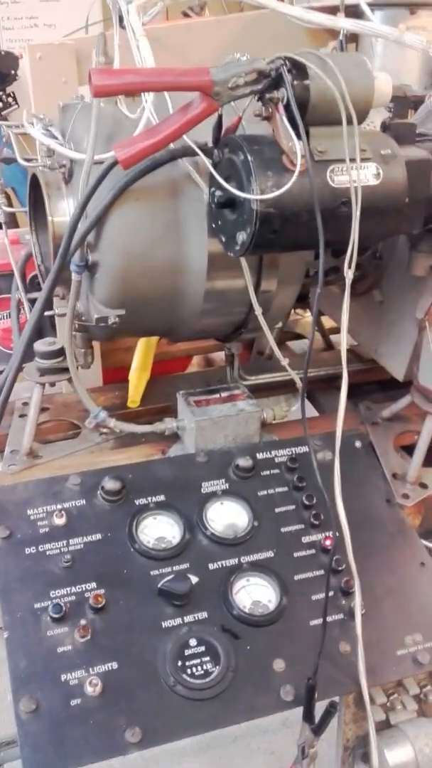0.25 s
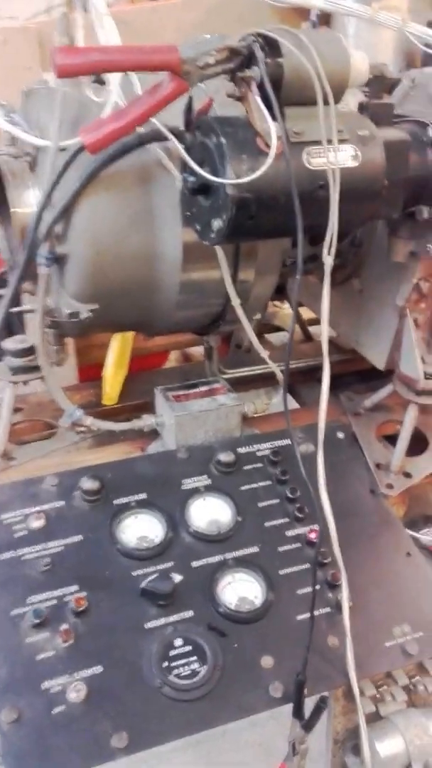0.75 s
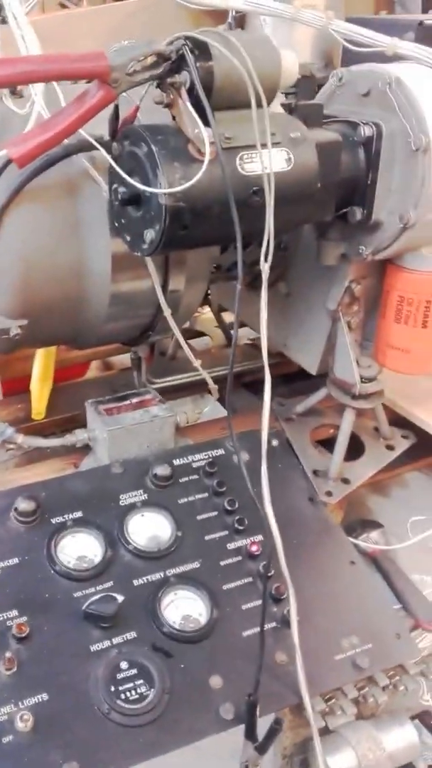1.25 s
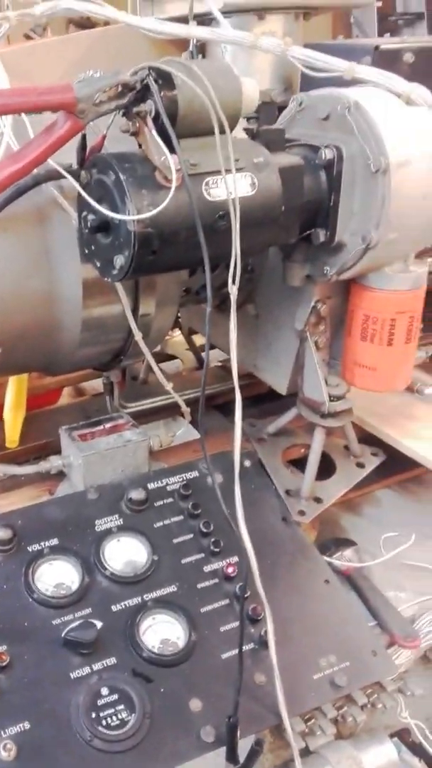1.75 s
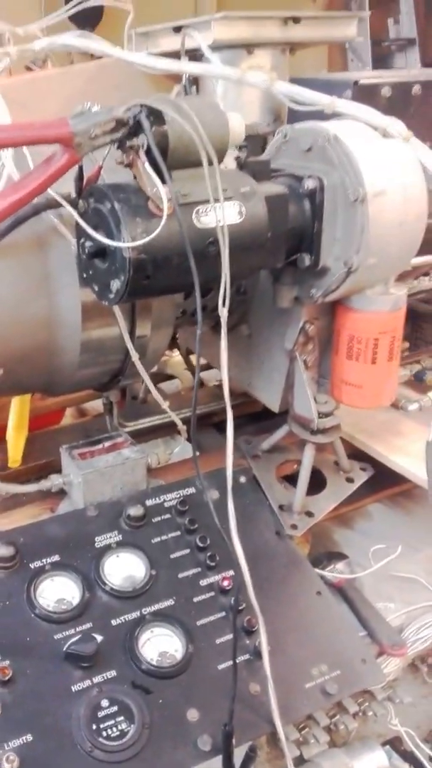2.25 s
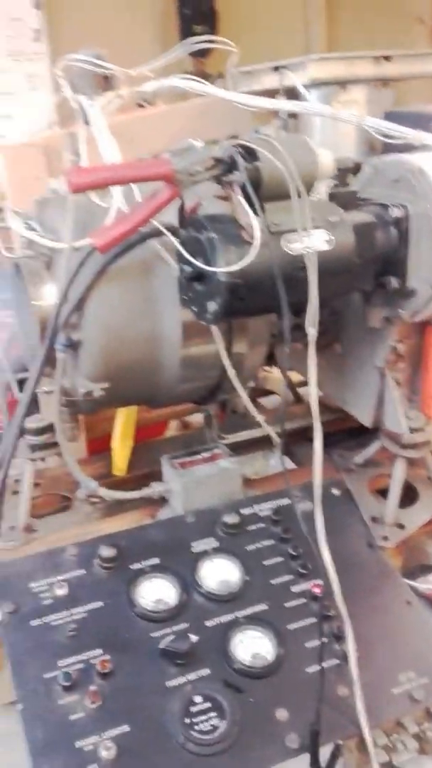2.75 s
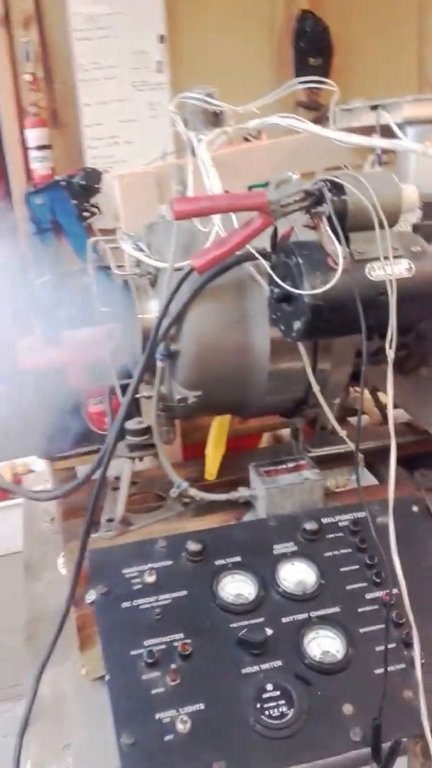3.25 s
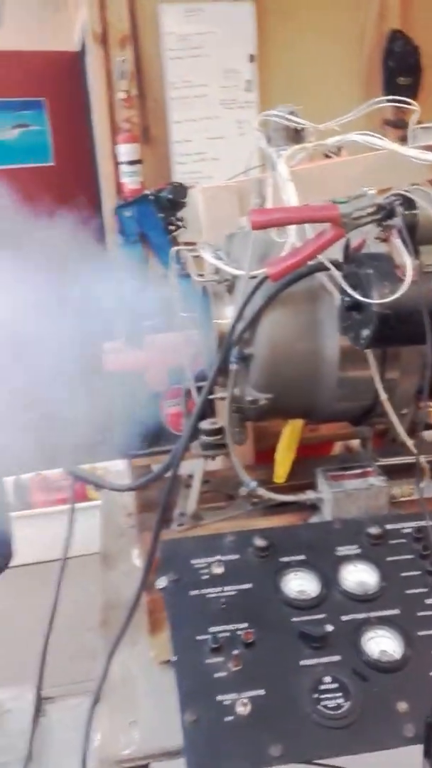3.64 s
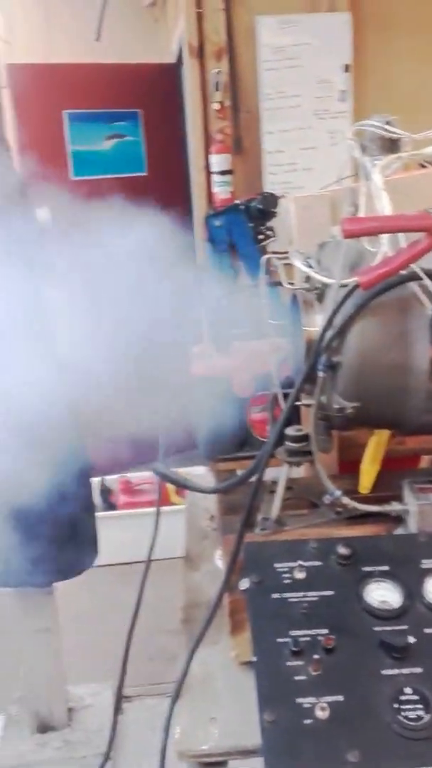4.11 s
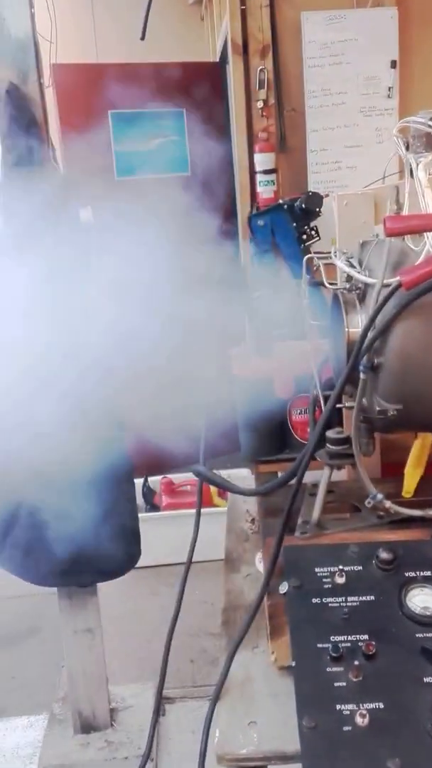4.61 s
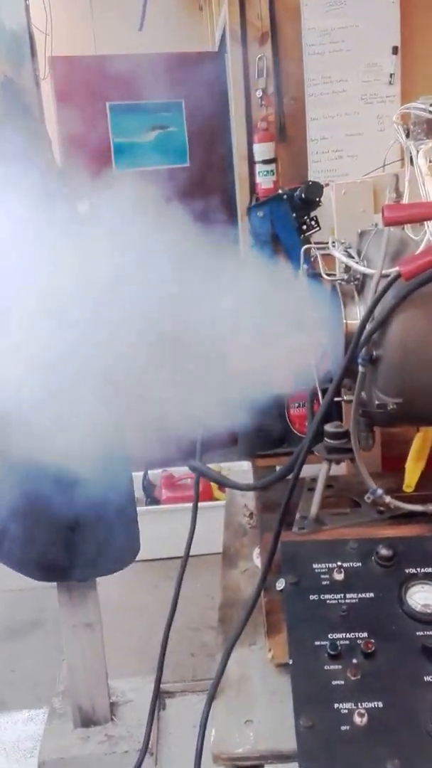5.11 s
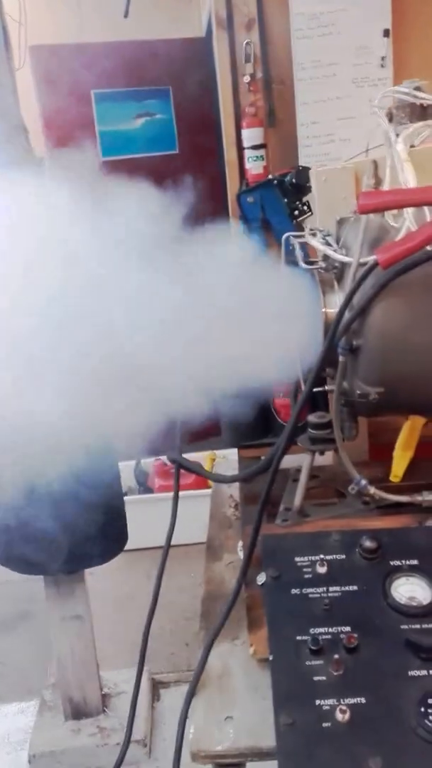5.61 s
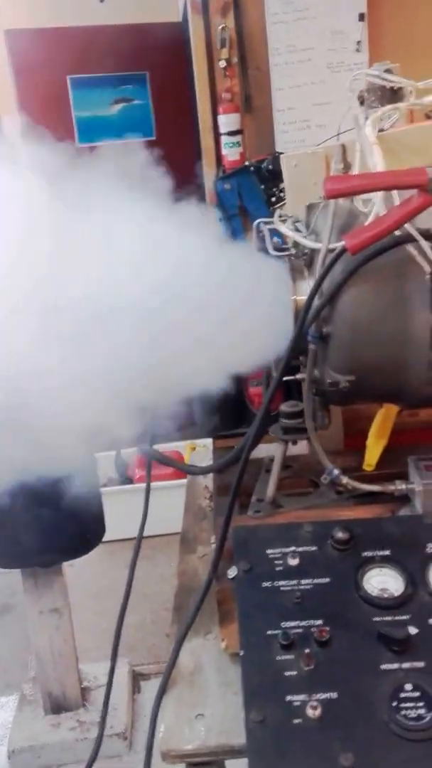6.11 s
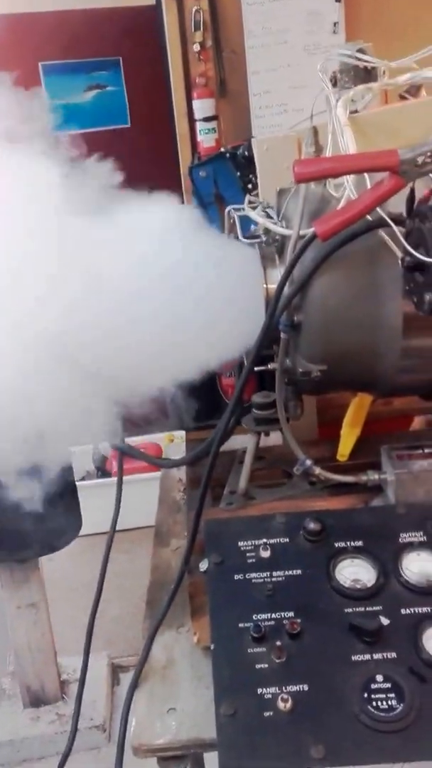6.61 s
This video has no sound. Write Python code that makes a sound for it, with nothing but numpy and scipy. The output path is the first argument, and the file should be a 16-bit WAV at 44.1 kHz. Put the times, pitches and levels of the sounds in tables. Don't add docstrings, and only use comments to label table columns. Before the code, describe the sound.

From 0 s a small gas turbine, close by in a workshop, screams with a piercing whine near 3 kHz inside a dense roar and bright hiss of air. It is already coasting down: the pitch slides smoothly, near 2.1 kHz at 2 s and 1.4 kHz at 4 s. The tone flutters, with rapid dropouts and swells as it crosses room and casing resonances; rough higher overtones glide down with it. Air stays strong until about 1.5 s, then weakens, losing treble first and sounding more hollow and ducted. A faint gear tone fades after 4.3 s. From 4.9 s, small dry spits and sizzling ticks stand out, strongest around 5.6-5.9 s. By 6.9 s a much quieter whine below 800 Hz and soft air remain, still falling, not stopped. Mono phone sound, limited peaks, short room tail, barely audible shop murmur and hum.

```python
import sys
import numpy as np
from scipy import signal
from scipy.fft import rfft, irfft
from scipy.io import wavfile
from scipy.ndimage import uniform_filter1d

SR = 44100
rng = np.random.default_rng(int(sys.argv[2]) if len(sys.argv) > 2 else 0)


def gain_from_decibels(decibels):
    exponent = np.asarray(decibels, float) / 20
    return 10 ** exponent


def int16_out(signal):
    q = np.round(np.clip(np.atleast_2d(signal).T, -1, 1) * 32767)
    wavfile.write(sys.argv[1], SR, q.astype(np.int16))


N = 302526

IMPELLER, TURBINE, VANES, GEAR = 19, 26, 17, 5
GEAR_STOP_S, GEAR_FADE_DB_PER_S = 4.3, 11
ROAR_HISS_JOINT_HZ = 3300
SIZZLE_DB, SIZZLE_DB_PER_FLOW_DB, SIZZLE_LEAST_DB = -38, 1.8, -82
SHOP_DB, SHOP_HZ, HUM_DB, HUM_HZ = -71, 130, -78, 101
PHONE_EDGE_HZ = 15735
CONVERTER_OFFSET = -.00062

# time [s], blade-passing rate of the impeller [Hz].
BLADE_RATE_HZ = [(0.0, 3028.6), (0.4, 2823.9), (0.8, 2633.9), (1.2, 2455.3), (1.6, 2285.9), (2.0, 2125.1),
                 (2.4, 1972.3), (2.8, 1827.5), (3.2, 1690.9), (3.6, 1562.6), (4.0, 1442.4), (4.4, 1330.0),
                 (4.8, 1225.1), (5.2, 1127.0), (5.6, 1034.9), (6.0, 947.9), (6.4, 865.0), (6.86, 773.5)]
# level at full speed [dB], loss per halving of speed [dB].
TONE_LAW_DB = [
    (-15, 29.5),
    (-30, 29),
    (-33.5, 25),
    (-44, 29),
    (-43, 28),
    (-51, 20),
    (-57, 5.5),
    (-56.5, 22.5),
    (-50.5, 7.5),
]
# centre [Hz], width [Hz], lift [dB].
PASSAGES_HZ_DB = [(992.0, 47.0, 5), (1347, 214, 16.5), (1743, 216, 18), (1958, 147, 13.0),
                  (2095, 111, 10.5), (2410, 364, 16.5), (2642, 100, 7.5), (3297.0, 63.0, 3.0),
                  (3575, 190, 21), (4848.0, 170, 15.5), (5550, 290, 15.0), (7860, 370, 10.5),
                  (9070, 860, 10.5), (11525.0, 250, 11)]
# time [s], depth [dB], width [ms].
NULLS_S_DB_MS = [(0.03, 6, 11), (0.155, 2.5, 16), (0.205, 5.5, 15), (0.81, 5, 30), (0.927, 3.5, 13),
                 (1.095, 10, 9.2), (1.432, -1, 9.4), (1.475, -1, 8), (1.528, 15, 38), (1.603, 12, 11),
                 (1.66, 7, 36), (1.719, 9, 19), (1.837, 6.5, 23), (1.898, 12.5, 19), (1.968, 7, 6.2),
                 (2.04, 29.5, 12), (2.062, 10.5, 14), (2.11, 2, 12), (2.161, 19, 21), (2.252, 9, 19),
                 (2.365, 23, 20), (2.51, 6, 35), (2.592, 17, 11), (2.678, 7, 17), (2.836, 13, 24),
                 (3.247, 10, 25), (3.297, 24, 18), (3.376, 6, 36), (3.444, -1, 15), (3.574, 20, 38)]
# time [s], length [s], change [dB].
IMPELLER_WAVES = [(0.03, 0.16, -4.5), (1.08, .14, -7), (1.35, 0.69, 2), (1.69, 0.16, -1), (1.88, 0.081, 9),
                  (2.09, .05, 1.5), (2.33, 0.091, -4.5), (2.57, 0.053, -6.5), (3.0, 0.12, -9),
                  (3.28, 0.077, -1), (3.54, 0.051, -8), (3.69, 0.12, -5), (3.97, 0.16, -12),
                  (4.29, 0.085, -7), (4.38, 0.063, -16), (4.78, 0.17, -9), (5.07, 0.17, 8),
                  (5.28, 0.1, -20), (5.59, .36, 17), (6.0, 0.11, 12), (0.1, .05, 3), (0.27, 0.023, -4),
                  (0.41, 0.036, -5), (0.62, 0.082, -2), (1.72, 0.025, -2.5), (2.01, 0.023, -11),
                  (3.32, .04, 2), (3.4, .05, 0), (4.33, .04, -8), (4.56, .04, -1)]
# time [s], length [s], change [dB].
OCTAVE_WAVES_S_DB = [(0.033, .15, 4.5), (0.797, .2, -2), (1.078, .17, 7), (2.03, .12, -12),
                     (2.292, 0.13, 11), (2.58, 0.2, 7), (3.548, 0.23, 22), (3.81, 0.074, 16),
                     (3.93, .14, 12), (4.886, 0.54, 13), (4.977, 0.33, 10.5), (5.327, 0.27, 30),
                     (5.488, .1, 9), (6.14, 0.25, 15), (0.525, 0.13, -0.5), (1.63, .12, 6.5), (1.88, .1, 6),
                     (2.56, .04, -14), (3.7, .07, -4), (4.72, 0.13, 2), (5.133, 0.089, -11)]
# time [s], length [s], change [dB].
OVERTONE_WAVES = [
    [(1.4, .15, 4), (2.78, .1, -15), (3.02, .23, 12), (3.45, .12, -1), (.12, 0.14, 0.5), (2.3, 0.14, 9)],
    [(0.85, .12, 13), (2.4, .15, 6), (2.66, .21, 24)],
    [(0.45, .2, 5), (2.37, .25, 14), (3.6, .2, 12)],
    [(1.0, .25, 8), (3.8, .25, 16)],
]
# time [s], length [s], change [dB].
TURBINE_WAVES_S_DB = [(2.55, 0.48, 16), (3.386, 0.59, 25), (4.184, 0.18, 17.5), (4.376, 0.19, 14.5),
                      (4.75, 0.17, -7), (5.125, 0.79, 16.5), (5.7, 0.46, -1.5), (2.5, .15, 0),
                      (3.75, .2, -1), (4.227, 0.052, -18), (4.47, .15, -4)]
# time [s], length [s], change [dB].
VANE_WAVES_S_DB = [(0.86, 0.56, 23), (5.4, .57, 23.5), (5.55, 0.35, 22)]
# time [s], strength [dB].
FLOW_DB = [(0, 0), (.2, 0), (.5, 0), (.8, -.5), (1.0, 1.5), (1.25, -1), (1.5, 0), (1.8, -1), (2.2, -2.5),
           (2.6, -3.5), (3.0, -5.5), (3.5, -7), (4.0, -9.5), (4.6, -12.5), (5.2, -14.5), (5.8, -17),
           (6.3, -19), (6.86, -21.5)]
# low edge [Hz], high edge [Hz].
AIR_BANDS_HZ = [
    (80, 300),
    (650, 820),
    (880, 1020),
    (1100, 1400),
    (2000, 2450),
    (2700, 3100),
    (3400, 3900),
    (6500, 10000),
    (12000, 14500),
]
# level at full flow [dB], share of flow [dB/dB], extra at best speed [dB],
# best blade rate [Hz], spread [octaves].
AIR_LAW_DB = [
    (-51.5, 0.7, 1.5, 2500, 0.22),
    (-39.5, .5, 5.5, 1630, 0.72),
    (-42, 0.63, 11, 1480, 0.59),
    (-35, 0.63, 10, 2090, 0.4),
    (-22.5, 0.7645, 4.5, 1560, 0.34),
    (-35, 0.97, 6, 2040, 0.36),
    (-28.5, 1.01, 0, 2000, 0.45),
    (-28, 1.06, 4, 1820, 0.52),
    (-39, 1.19, -0.5, 2400, .4),
]
# frequency [Hz], density [dB per Hz].
ROAR_DB_PER_HZ = [(20, -46), (40, -44), (60, -69), (100, -31), (200, -23), (400, -22), (650, -18),
                  (860, -21.5), (1200, -16.5), (1600, -11.5), (2150, -5.5), (2600, -8.5), (3300, -17.5)]
# frequency [Hz], density [dB per Hz].
HISS_DB_PER_HZ = [(3300, -11.5), (3620, -3), (4500, -10), (5100, -7), (6400, -7.5), (7800, -4.5),
                  (9100, -6.5), (10500, -16.5), (12000, -21), (13400, -23.5), (14500, -29.5), (15700, -29)]
# centre [Hz], width [Hz], lift [dB].
DUCTS_HZ_DB = [(375, 27, 6), (447, 46, 1.5), (607.4, 21, 5), (730, 35, 11), (784, 21, 6.5), (949, 72, 10),
               (1030, 22, 4.5), (1184, 145, 13), (1360, 124, 9), (1900, 83, 0.5), (2163, 180, 7),
               (2314, 110, 3), (2433, 120, 2.5), (2970, 160, 3), (3532, 254, 8.5), (4930, 380, 2.5),
               (5970, 280, 3), (7050, 500, 3.5), (8940, 770, 2.5)]
# time [s], factor on the lift [1].
RINGING_FACTOR = [(0, 0.96), (2.5, 1.11), (3.8, 1.46), (5, 0.92), (6.86, 1.14)]
# time [s], peak [dB].
SPITS_S_DB = [(4.9176, -50), (4.957, -51), (5.158, -54), (5.2428, -52), (5.38, -52), (5.4588, -49),
              (5.4788, -50), (5.5466, -53), (5.6374, -45), (5.6813, -53), (5.7836, -45), (5.82, -50),
              (5.9068, -42), (6.0071, -52), (6.0655, -48), (6.1667, -48), (6.2176, -49), (6.265, -54),
              (6.3084, -51), (6.5798, -55), (6.722, -58), (6.7968, -54)]
# centre time [s], low edge [Hz], high edge [Hz], level [dB].
PATCHES_S_HZ_DB = [(1.343, 11100, 13150, -48), (1.366, 4150, 5250, -37), (1.366, 6200, 7600, -33),
                   (1.366, 10300, 12000, -43), (1.366, 12400, 15880, -47), (1.435, 5600, 6950, -39),
                   (1.435, 12350, 15900, -42), (2.319, 13700, 15200, -48), (2.617, 10270, 11780, -46),
                   (2.989, 4160, 5200, -40), (3.641, 5130, 6350, -41), (4.407, 8240, 9700, -44),
                   (4.407, 13100, 14500, -64), (4.754, 4250, 5220, -46)]


def blades():
    t = np.arange(N) / SR
    shaft_hz = follow(BLADE_RATE_HZ, t)[0] / IMPELLER
    orders = [k * IMPELLER for k in range(1, 7)] + [TURBINE, VANES, GEAR]
    wave_tables = [IMPELLER_WAVES, OCTAVE_WAVES_S_DB, *OVERTONE_WAVES, TURBINE_WAVES_S_DB, VANE_WAVES_S_DB, []]
    coarse = slice(None, None, 64)
    levels_db = []
    for law, order, rows in zip(TONE_LAW_DB, orders, wave_tables):
        coarse_db = strength(law, order, shaft_hz[coarse]) + waves(rows, t[coarse])
        levels_db.append(np.interp(t, t[coarse], coarse_db))
    first_db, second_db, *upper_db, turbine_db, vane_db, gear_db = levels_db
    gear_db = gear_db - GEAR_FADE_DB_PER_S * np.maximum(t - GEAR_STOP_S, 0)

    first = tone(shaft_hz, IMPELLER, first_db, rough=.12, flutter_hz=35)
    speed = np.clip(shaft_hz / shaft_hz[0], 0, 1)
    rest = tone(shaft_hz, 2 * IMPELLER, second_db, rough=.7 * speed ** 2, flutter_hz=40)
    for k, level_db in enumerate(upper_db, start=3):
        rest += tone(shaft_hz, k * IMPELLER, level_db, rough=.68, flutter_hz=28)
    rest += tone(shaft_hz, TURBINE, turbine_db, rough=.6, flutter_hz=14)
    rest += tone(shaft_hz, VANES, vane_db, rough=.56, flutter_hz=24)
    rest += tone(shaft_hz, GEAR, gear_db, rough=.3, flutter_hz=6)

    first = nulls(t) * (first + gain_from_decibels(-17) * workshop(first, t60_s=.35))
    return first + rest + gain_from_decibels(-13) * workshop(rest, t60_s=.35)


def tone(shaft_hz, per_turn, level_db, rough, flutter_hz):
    turns = np.cumsum(shaft_hz) / SR
    rough = np.clip(rough, 0, 1)
    shake = np.sqrt(1 - rough ** 2) + rough * flutter(flutter_hz)
    wave = (shake * np.exp(2j * np.pi * (per_turn * turns + rng.random()))).real
    return np.sqrt(2) * gain_from_decibels(level_db) * wave * (per_turn * shaft_hz < .4 * SR)


def flutter(hz):
    noise = rng.standard_normal(N) + 1j * rng.standard_normal(N)
    return evened(signal.sosfilt(signal.butter(2, hz, fs=SR, output="sos"), noise))


def strength(law, per_turn, shaft_hz):
    full_db, loss_db = law
    lift_db = sum(db / (1 + (2 * (per_turn * shaft_hz - hz) / width_hz) ** 2)
                  for hz, width_hz, db in PASSAGES_HZ_DB)
    return full_db + loss_db * np.log2(shaft_hz / shaft_hz[0]) + lift_db


def waves(rows, t):
    return sum(db * np.exp(-4 * np.log(2) * ((t - s) / length_s) ** 2) for s, length_s, db in rows)


def nulls(t):
    depth_db = sum(db * np.exp(-(1700 * (t - s) / width_ms) ** 2) for s, db, width_ms in NULLS_S_DB_MS)
    return gain_from_decibels(-depth_db)


def workshop(x, t60_s):
    t = np.arange(SR // 2) / SR
    tail = rng.standard_normal(len(t)) * gain_from_decibels(-60 * t / t60_s) * (t > .006)
    return signal.fftconvolve(x, tail / np.linalg.norm(tail))[:N]


def airflow():
    frames, hz = N // 512 + 5, np.fft.rfftfreq(2048, 1 / SR)
    t = np.arange(frames) * 512 / SR
    hz_column = hz[:, None]
    roar_db, hiss_db = read(ROAR_DB_PER_HZ, hz), read(HISS_DB_PER_HZ, hz)
    joint = np.searchsorted(hz, ROAR_HISS_JOINT_HZ)
    colour_db = np.where(hz < ROAR_HISS_JOINT_HZ, roar_db - roar_db[joint], hiss_db - hiss_db[joint])
    colour_db = colour_db[:, None] + ducts(hz, t)

    own_db = [10 * np.log10(np.sum(gain_from_decibels(2 * colour_db[(hz > low) & (hz < high)]), 0))
              for low, high in AIR_BANDS_HZ]
    lift_db = air_levels(t) - np.array(own_db)
    bands = np.arange(len(AIR_BANDS_HZ))
    place = np.interp(np.log(hz + 1), np.log(np.mean(AIR_BANDS_HZ, 1)), bands)
    share = np.maximum(1 - abs(place[:, None] - bands), 0)

    real, imag, eddies = rng.standard_normal((frames, len(hz), 3)).T
    eddies = evened(uniform_filter1d(uniform_filter1d(eddies, 24, 0), 5, 1))
    gusts = evened(uniform_filter1d(rng.standard_normal(frames), 2))
    shake_db = .96 * eddies + .54 * gusts * np.clip(hz_column / 9000, 0, 1.6)
    hollow_db = -8 * np.minimum(t / 5.5, 1) ** 2 / (1 + ((hz_column - 13300) / 1100) ** 2)
    spectrum = (real + 1j * imag) * gain_from_decibels(colour_db + share @ lift_db + shake_db + hollow_db)
    return gain_from_decibels(1.5) * signal.istft(spectrum, nperseg=2048, noverlap=1536)[1][:N]


def ducts(hz, t):
    drift = evened(uniform_filter1d(rng.standard_normal((2, len(DUCTS_HZ_DB), len(t))), 40, 2))
    pitch_hz, strength_drift = 9 * drift[0], .12 * drift[1]
    lift = follow(RINGING_FACTOR, t) * (1 + strength_drift)
    return sum(db * lift[k] / (1 + (2 * (hz[:, None] - centre_hz - pitch_hz[k]) / width_hz) ** 2)
               for k, (centre_hz, width_hz, db) in enumerate(DUCTS_HZ_DB))


def air_levels(t):
    flow_db, rate_hz = follow(FLOW_DB, t)[0], follow(BLADE_RATE_HZ, t)[0]
    return np.array([db + share * flow_db + extra_db * np.exp(-(np.log2(rate_hz / best_hz) / spread) ** 2)
                     for db, share, extra_db, best_hz, spread in AIR_LAW_DB])


def sizzle():
    t = np.arange(N) / SR
    mist_db = SIZZLE_DB + SIZZLE_DB_PER_FLOW_DB * follow(FLOW_DB, t)[0]
    bursts = (gain_from_decibels(mist_db) + gain_from_decibels(SIZZLE_LEAST_DB)) * gain_from_decibels(3 * flutter(18).real)
    for s, db in SPITS_S_DB:
        bursts += gain_from_decibels(db - 6) * np.exp(-np.maximum(t - s, 0) / .006) * (t > s)
    noise = rng.standard_normal(N)
    top = evened(band(noise, 4, 14300, 16300))
    skirt = evened(band(noise, 2, 10500, 14300))
    return bursts * (top + gain_from_decibels(-15) * skirt)


def shop():
    air = evened(band(rng.standard_normal(N), 3, .65 * SHOP_HZ, 2 * SHOP_HZ))
    return gain_from_decibels(SHOP_DB) * air + tone(np.full(N, HUM_HZ), 1, HUM_DB, rough=.6, flutter_hz=4)


def side_patches():
    side, hz = np.zeros(N), np.fft.rfftfreq(2048, 1 / SR)
    for s, low_hz, high_hz, db in PATCHES_S_HZ_DB:
        noise = irfft(rfft(rng.standard_normal(2048)) * (hz > low_hz) * (hz < high_hz))
        start = round(s * SR) - 1024
        side[start:start + 2048] += gain_from_decibels(db) * evened(noise) * signal.windows.hann(2048)
    return np.array([side, -side])


def band(x, order, low_hz, high_hz):
    return signal.sosfilt(signal.butter(order, [low_hz, high_hz], "band", fs=SR, output="sos"), x)


def evened(x):
    return x / np.sqrt(np.mean(abs(x) ** 2) + 1e-20)


def follow(rows, t):
    s, *columns = np.transpose(rows)
    return np.array([np.interp(t, s, column) for column in columns])


def read(points, hz):
    f, value = np.transpose(points)
    return np.interp(np.log(hz + 1), np.log(f + 1), value)


def scene():
    return np.tile(blades() + airflow() + sizzle() + shop(), (2, 1))


def top_cut(x):
    return signal.sosfilt(signal.butter(12, 16510, fs=SR, output="sos"), x)


def record(dry):
    power_db = 10 * np.log10(abs(uniform_filter1d(dry[0] ** 2, 300)) + 1e-12)
    fall_db = np.arange(N) * 65 / SR
    held_db = np.maximum.accumulate(power_db + fall_db) - fall_db
    over_db = np.maximum(held_db + 11.5, 0)
    limited = dry / gain_from_decibels(.38 * uniform_filter1d(over_db, 200))
    edge = signal.firwin(1023, PHONE_EDGE_HZ, window=("kaiser", 9), fs=SR)
    mix = signal.oaconvolve(limited, edge[None], "same") + side_patches() + CONVERTER_OFFSET
    return top_cut(mix)


dry = scene()
out = record(dry)
int16_out(out)
```